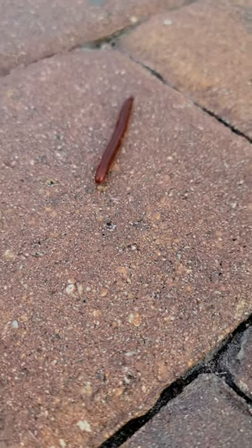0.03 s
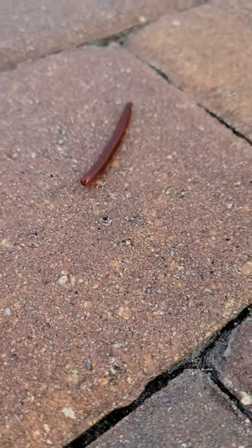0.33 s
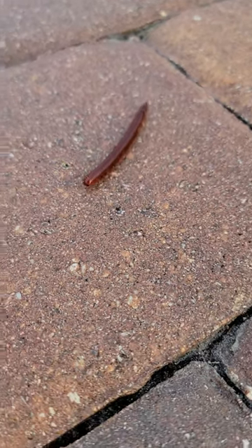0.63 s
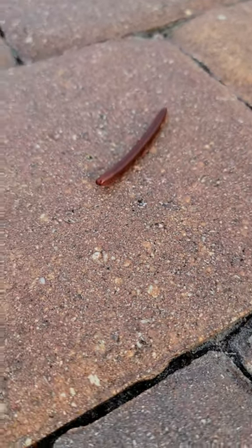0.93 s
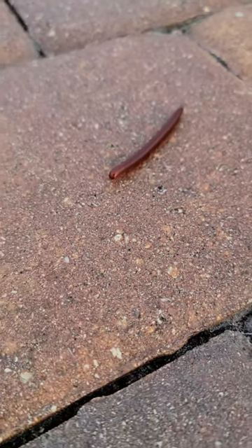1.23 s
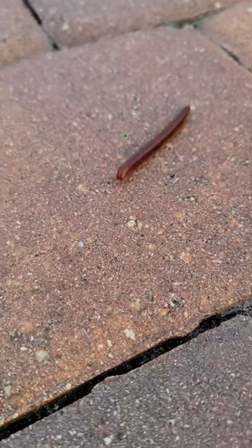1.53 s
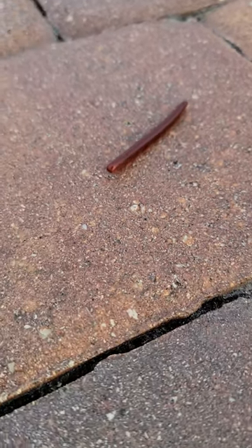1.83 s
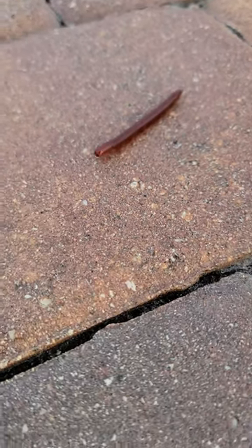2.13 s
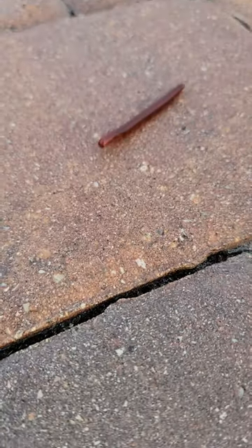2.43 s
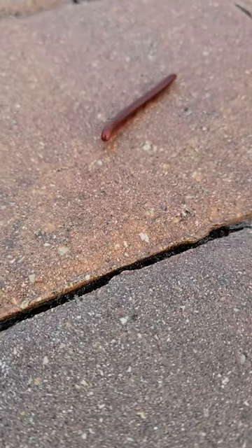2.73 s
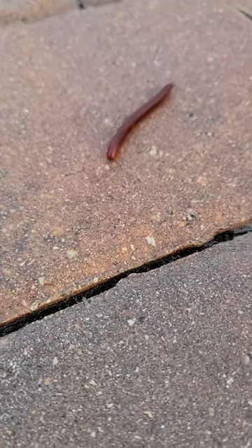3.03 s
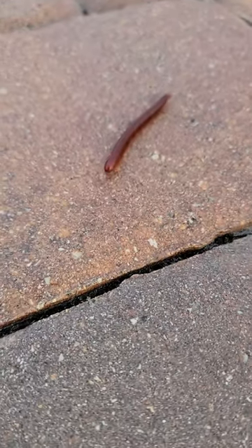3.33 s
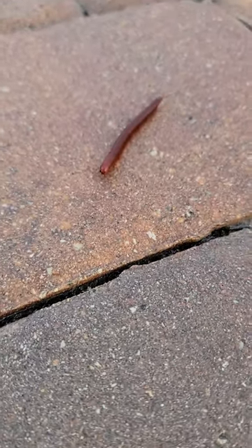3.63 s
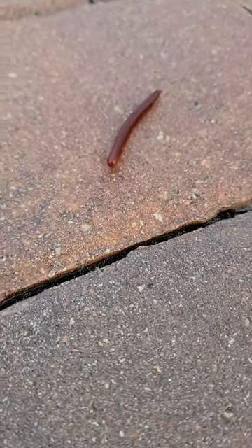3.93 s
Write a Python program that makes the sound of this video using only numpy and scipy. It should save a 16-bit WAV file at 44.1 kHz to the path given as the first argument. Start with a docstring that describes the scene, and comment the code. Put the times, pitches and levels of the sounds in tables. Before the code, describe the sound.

Distant traffic rumbles low outdoors, with a few soft microphone bumps at the start.

```python
"""Quiet outdoor air just above a paved path. From the start, far traffic rumbles, light wind puffs
on the microphone and distant machinery hums and whines faintly. In the first half second the
hand-held casing is bumped five times and rubbed by a finger, with two tiny ticks. From about
1.3 s on, more dry ticks and faint high chirps are scattered over the background."""
import sys
import numpy as np
from scipy import signal
from scipy.fft import rfft, irfft
from scipy.io import wavfile

SR = 44100
rng = np.random.default_rng(int(sys.argv[2]) if len(sys.argv) > 2 else 0)


def generate_wav(sig):
    """Save sig (samples, or channels by samples) to the path in sys.argv[1] as 16-bit PCM at SR."""
    pcm = np.round(np.clip(np.atleast_2d(sig).T, -1, 1) * 32767).astype(np.int16)
    wavfile.write(sys.argv[1], SR, pcm)


N = 176400
TIME_S = np.arange(N) / SR
FREQ_HZ = np.maximum(np.arange(N // 2 + 1) * SR / N, 1)
OPPOSED = np.array([[1], [-1]])


def from_db(db):
    """Decibels to gain."""
    return 10 ** (np.asarray(db) / 20)


def envelope(points):
    """Gain through time from (time_s, level_db) points."""
    return from_db(np.interp(TIME_S, *np.transpose(points)))


def decay(start_s, decay_s):
    """Jump to 1, then exponential decay."""
    return (TIME_S >= start_s) * np.exp(-np.minimum(abs(TIME_S - start_s) / decay_s, 20))


def over_freq(points):
    """(freq_hz, value) points interpolated on a log-frequency axis."""
    freq_hz, value = np.transpose(points)
    return np.interp(np.log(FREQ_HZ), np.log(freq_hz), value)


def resonance(centre_hz, width_hz):
    """Gain of a resonance applied twice."""
    return 1 / (1 + (2 * (FREQ_HZ - centre_hz) / width_hz) ** 2)


def pan(pan_db):
    """Constant-power stereo gains; pan_db is left minus right."""
    gains = from_db(OPPOSED * pan_db / 2)
    return gains / np.sqrt(np.mean(gains ** 2, axis=0))


def noise(spectrum, correlation=0, pan_db=0):
    """Coloured stereo noise, rms 1."""
    mid, side = rfft(rng.standard_normal((2, N)))
    pair = np.sqrt(1 + correlation) * mid + np.sqrt(1 - correlation) * side * OPPOSED
    coloured = irfft(pair * spectrum * pan(pan_db), N)
    return coloured / np.sqrt(np.mean(coloured ** 2))


def hum(pitch_hz, wander_hz, wander_rate_hz=4.98):
    """Sine of drifting pitch, rms 1."""
    drift_hz = wander_hz * noise(resonance(0, 2 * wander_rate_hz), correlation=0.99)[0]
    cycles = np.cumsum(pitch_hz + drift_hz) / SR + rng.random()
    return np.sqrt(2) * np.sin(2 * np.pi * cycles)


def self_noise(level_db=-94):
    """White hiss of the microphone."""
    return from_db(level_db) * rng.standard_normal((2, N))


def shimmer(level_db=-96.5, swing_db=4, rate_hz=17):
    """A faint high hiss that flickers."""
    flicker_db = swing_db * noise(resonance(0, 2 * rate_hz), correlation=0.98)[0]
    hiss = noise(resonance(6550, width_hz=1700), pan_db=-7.5)
    return from_db(level_db + flicker_db) * hiss


# Chirps: centre_s, level_db, pitch_hz
CHIRP_EVENTS = [(1.29, -80, 3220), (1.412, -80, 3050), (1.98, -89, 6460), (2.17, -76, 2700),
                (2.70, -83.5, 6600), (2.76, -80, 3000), (3.18, -86, 6800), (3.33, -82, 3300),
                (3.73, -83, 6650), (3.91, -83, 6900)]
def chirps(half_length_s=.012):
    """Short, high narrow-band chirps, barely above the background."""
    sound = np.zeros((2, N))
    for centre_s, level_db, pitch_hz in CHIRP_EVENTS:
        bell = np.exp(-np.minimum(((TIME_S - centre_s) / half_length_s) ** 2, 20))
        sound += from_db(level_db) * bell * noise(resonance(pitch_hz, width_hz=520), pan_db=-2.5)
    return sound


# Machinery tones: pitch_hz, level_db, width_hz, pan_db
WHINE_TONES = [(296, -73, 4, -4), (862, -81, 25, -4), (1019, -83, 20, -4), (1185, -88, 4, -3),
               (1253, -83, 18, -2), (1304, -84, 4, -3), (1540, -90, 4, -4), (1756, -87, 5, -2),
               (1885, -87, 24, -2), (2075, -96, 4, -7), (2726, -100, 8, 2), (4979, -104, 6, -6),
               (7942, -102, 15, -6), (8180, -108, 10, -6)]
def machinery_whine():
    """Thin tones that fade in and out over the distance."""
    return sum(from_db(level_db) * noise(resonance(pitch_hz, width_hz), correlation=-0.49, pan_db=pan_db)
               for pitch_hz, level_db, width_hz, pan_db in WHINE_TONES)


# Swells of the strongest machinery tone: centre_s, half_length_s, gain_db
THROB_SWELLS = [(.45, .08, -83), (1.197, 0.18, -78.5), (1.794, 0.17, -74.5), (2.47, 0.1, -73.5),
                (3.108, 0.053, -76.5), (3.395, .06, -81), (3.884, 0.11, -81)]
def machinery_throb(pitch_hz=1431, wander_hz=6.7, rest_gain_db=-86, opposed_db=7):
    """One swelling tone reaches the microphone ports by two paths, in phase and opposed."""
    in_phase = hum(pitch_hz, wander_hz)
    opposed = from_db(opposed_db) * hum(pitch_hz, wander_hz) * OPPOSED
    swells = sum(from_db(gain_db) / (1 + (abs(TIME_S - centre_s) / half_length_s) ** 8)
                 for centre_s, half_length_s, gain_db in THROB_SWELLS)
    return (from_db(rest_gain_db) + swells) * (in_phase + opposed) / 2 * pan(-3.5)


# Wind spectrum: freq_hz, relative_db
WIND_SPECTRUM = [(12, -35), (24, -18), (36, 8), (45, -1.5), (60, -15.5), (120, -53), (500, -130)]
# Puffs: time_s, level_db
WIND_ENVELOPE = [(0, -44.5), (.12, -62), (.3, -54), (.47, -70), (.7, -64), (.85, -66), (1.32, -65.5),
                 (1.5, -64), (1.61, -66), (1.72, -58), (1.92, -65.5), (2.15, -63), (2.45, -56.5),
                 (2.58, -67), (2.7, -59.5), (3.25, -69), (3.65, -65.5), (3.85, -67), (4, -66)]
def wind():
    """Light puffs of air push on the ports, deep in the bass."""
    buffet = noise(from_db(over_freq(WIND_SPECTRUM)), correlation=0.73, pan_db=-2.5)
    return envelope(WIND_ENVELOPE) * buffet


# Tyre and air spectrum: freq_hz, relative_db
WASH_SPECTRUM = [(60, -36), (200, 1.5), (300, 5), (420, 3.5), (520, 3.5), (640, -0.5), (830, 1),
                 (1010, -0.5), (1150, -4.5), (1380, -5), (1520, -14), (1680, -13.5), (1880, -10.5),
                 (2050, -16.5), (2400, -18), (2900, -20), (3150, -24), (3400, -22), (3900, -23),
                 (4400, -27.5), (4950, -26.5), (5750, -35), (6350, -27), (6800, -29), (7500, -37),
                 (7900, -29), (8300, -38), (8700, -34.5), (9400, -43.5), (11000, -46), (16000, -40.5)]
# Wash loudness: time_s, level_db
WASH_ENVELOPE = [(0, -59), (.3, -61), (.55, -60), (1.4, -60), (2.1, -60.5), (2.7, -60.5), (3.1, -60.5),
                 (4, -60.5)]
# Left-right likeness: freq_hz, correlation
WASH_CORRELATION = [(150, 1), (300, -0.6), (450, -0.46), (750, -0.77), (1300, -0.66), (2000, 0.28),
                    (2600, -0.021), (3200, -0.079), (6000, 0.023)]
# Left minus right level: freq_hz, pan_db
WASH_BALANCE = [(200, -4), (800, -5), (1500, -3.5), (1880, -2), (2050, -8), (2400, 1.5), (3000, -2),
                (3400, -5), (4400, -8), (7900, -5), (8500, 0)]
# Left minus right phase shift: freq_hz, phase_rad
WASH_PHASE_SHIFT = [(200, -0.29), (400, -0.45), (600, -0.88), (1000, -0.056), (1600, -0.19), (2000, 1),
                    (2600, 0.099)]
def tyre_wash():
    """Wide wash of far tyres and air, shifted in phase between the ports."""
    spectrum = from_db(over_freq(WASH_SPECTRUM))
    wash = envelope(WASH_ENVELOPE) * noise(spectrum, over_freq(WASH_CORRELATION), over_freq(WASH_BALANCE))
    phase_rad = over_freq(WASH_PHASE_SHIFT) / 2 * OPPOSED
    return irfft(rfft(wash) * np.exp(1j * phase_rad), N)


# Engine tones: pitch_hz, base_db, wander_hz
ENGINE_TONES = [(65.2, -53, 2.35), (76.25, -53.5, 2.542), (157.6, -72.5, 2.04)]
# Drone swells: time_s, gain_db
ENGINE_ENVELOPE = [(0, 3.5), (.18, -5.5), (.26, 9.5), (.32, 5), (.38, -6), (.45, 12.5), (.55, -6.5),
                   (.62, 13.5), (.665, -2), (.715, 8), (.8, -3.5), (.88, 1.5), (.97, 2), (1.38, 5),
                   (1.65, -4), (1.70, 3.5), (2.05, -4.5), (2.42, -16.5), (2.52, 2), (2.8, -2), (2.95, 4),
                   (3.07, -3.5), (3.17, 6), (3.27, -6), (3.38, 0.5), (3.65, -1), (4, 5)]
def engine_drone():
    """Far engines: two close tones beat under a fainter hum."""
    tones = sum(from_db(base_db) * hum(pitch_hz, wander_hz)
                for pitch_hz, base_db, wander_hz in ENGINE_TONES)
    return envelope(ENGINE_ENVELOPE) * tones * pan(-1.8)


# Traffic spectrum: freq_hz, relative_db
RUMBLE_SPECTRUM = [(12, -49.5), (22, -37), (36, -27.5), (50, -8), (62, -6), (80, -7), (100, -6.5),
                   (150, -11), (200, -18), (240, -18.5), (280, -24.5), (400, -35.5), (800, -89.5)]
# Traffic loudness: time_s, level_db
RUMBLE_ENVELOPE = [(0, -50), (.28, -49), (.5, -49.5), (.68, -51), (1.0, -50), (1.42, -50), (1.63, -54),
                   (1.72, -50.5), (1.88, -50.5), (2.1, -48.5), (2.4, -52.5), (2.75, -50.5), (3.1, -49.5),
                   (3.65, -51), (4, -50)]
def traffic_rumble():
    """Deep noise of far traffic, nearly alike at both ports."""
    rumble = noise(from_db(over_freq(RUMBLE_SPECTRUM)), correlation=0.93, pan_db=-1.8)
    return envelope(RUMBLE_ENVELOPE) * rumble


# Ticks: start_s, level_db, tilt_db_per_octave
TICK_EVENTS = [(0.222, -69, 7), (0.264, -66, 7), (1.368, -63.5, 5), (1.402, -73, 2), (1.440, -72, -1),
               (2.155, -66, 4), (2.3428, -65, 1.5), (2.4466, -68.5, 1.5), (3.481, -63, 0), (3.881, -63, -3),
               (3.983, -65, -3)]
# Tick spectrum before tilt: freq_hz, relative_db
TICK_SPECTRUM = [(800, -12), (2500, 3), (4500, -4), (7000, -2), (10000, -8.5), (12500, -25), (16000, -20)]
def ticks(decay_s=.0012, pivot_hz=6000):
    """Dry millisecond snaps near the right port, some duller than others."""
    octaves = np.maximum(np.log2(FREQ_HZ / pivot_hz), -2)
    sound = np.zeros((2, N))
    for start_s, level_db, tilt_db_per_octave in TICK_EVENTS:
        spectrum = from_db(over_freq(TICK_SPECTRUM) + tilt_db_per_octave * octaves)
        sound += from_db(level_db) * decay(start_s, decay_s) * noise(spectrum, pan_db=-10)
    return sound


# Bumps on the casing: start_s, gain_db, start_pitch_hz
CASING_BUMPS = [(0.0648, -30.8, 1020), (0.1329, -33.8, 780), (0.1746, -32.5, 800), (0.2197, -33.3, 790),
                (0.2594, -33.8, 700)]
# Finger friction spectrum: freq_hz, relative_db
RUB_SPECTRUM = [(200, -4), (1000, 5.5), (2500, -5.5), (4000, -12.5), (6500, -14), (9000, -26), (15000, -21)]
# Finger rub: time_s, level_db
RUB_ENVELOPE = [(0, -69), (.15, -71), (.22, -69), (.255, -69.5), (.29, -63.5), (.32, -68), (.42, -71.5),
                (.55, -85)]
def handling():
    """Bumps flex the casing: falling knocks, opposed at the ports; thump, scuff and rub on the right."""
    end_pitch_hz, fall_s, attack_s, knock_decay_s = 160, .0016, .0003, .004
    thump_hz, thump_decay_s, thump_gain_db = 107, .0036, 5.5
    scuff_decay_s, scuff_gain_db = .0052, -31
    left_lag_s, left_gain_db = .000067, -8
    knocks, thumps, scuffs = np.zeros((3, N))
    for start_s, gain_db, start_pitch_hz in CASING_BUMPS:
        age_s = np.clip(TIME_S - start_s, 0, .5)
        glide_cycles = (start_pitch_hz - end_pitch_hz) * fall_s * (1 - np.exp(-age_s / fall_s))
        knock = np.sin(2 * np.pi * (end_pitch_hz * age_s + glide_cycles))
        attack = 1 - np.exp(-np.minimum((age_s / attack_s) ** 2, 20))
        knocks += from_db(gain_db) * attack * np.exp(-age_s / knock_decay_s) * knock
        thump_shape = age_s / thump_decay_s * np.exp(-age_s / thump_decay_s)
        thumps += from_db(gain_db + thump_gain_db) * thump_shape * np.sin(2 * np.pi * thump_hz * age_s)
        scuffs += from_db(gain_db + scuff_gain_db) * decay(start_s, scuff_decay_s)
    friction = (envelope(RUB_ENVELOPE) + scuffs) * noise(from_db(over_freq(RUB_SPECTRUM)))[1]
    left = -from_db(left_gain_db) * np.interp(TIME_S - left_lag_s, TIME_S, knocks)
    return np.array([left, knocks + thumps + friction])


def scene():
    """Far sources, wind, near noises and hiss, summed in stereo."""
    traffic = traffic_rumble() + engine_drone() + tyre_wash()
    outdoors = traffic + wind() + machinery_whine() + machinery_throb()
    return outdoors + handling() + ticks() + chirps() + shimmer() + self_noise()


def record(dry):
    """Short fades at both ends, then a steep low-pass."""
    fade_s, cutoff_hz = .006, 15750
    fade = np.minimum(np.minimum(TIME_S, TIME_S[::-1]) / fade_s, 1)
    lowpass = signal.ellip(10, .1, 70, cutoff_hz, fs=SR, output="sos")
    return signal.sosfilt(lowpass, dry * fade)


dry = scene()
out = record(dry)
generate_wav(out)
```